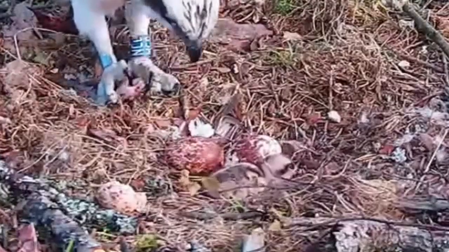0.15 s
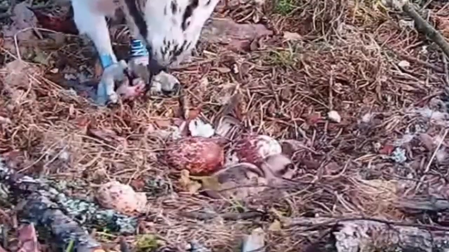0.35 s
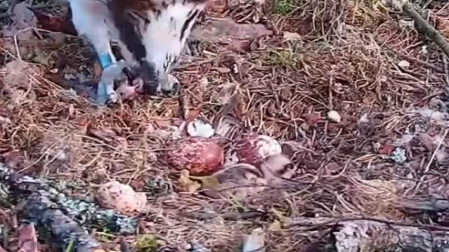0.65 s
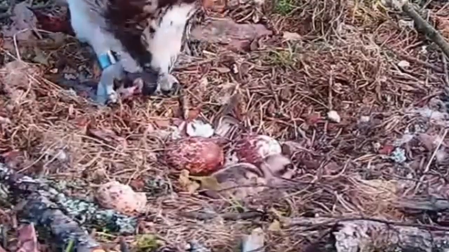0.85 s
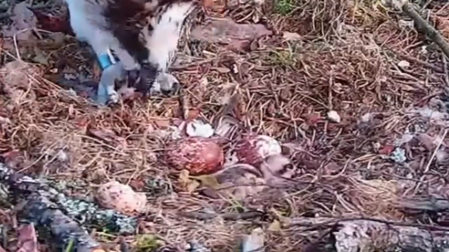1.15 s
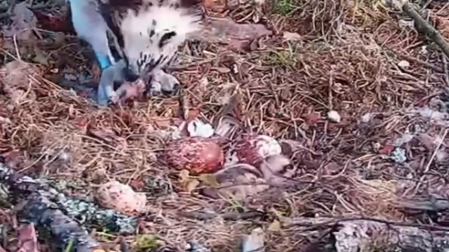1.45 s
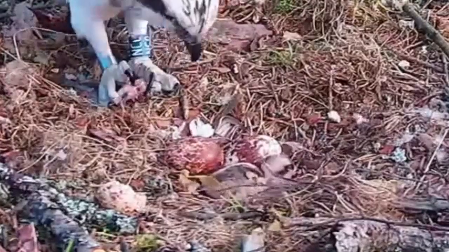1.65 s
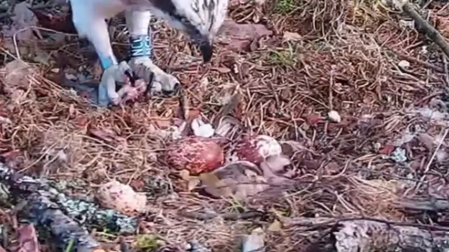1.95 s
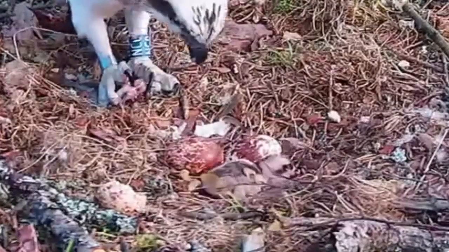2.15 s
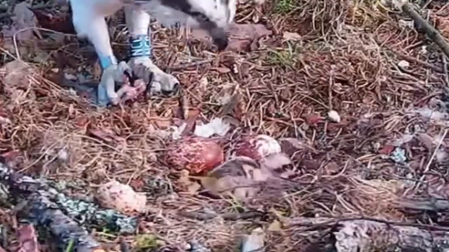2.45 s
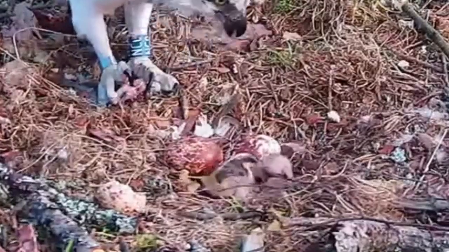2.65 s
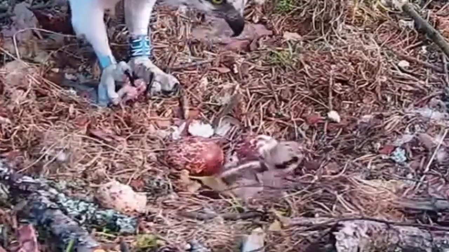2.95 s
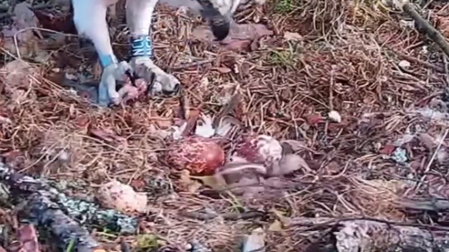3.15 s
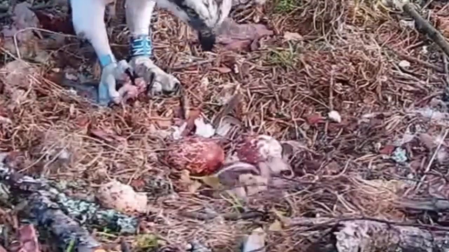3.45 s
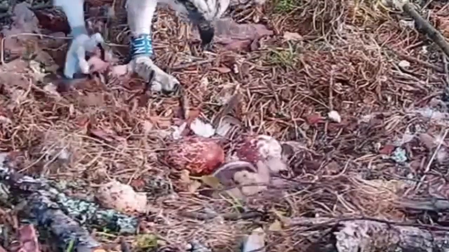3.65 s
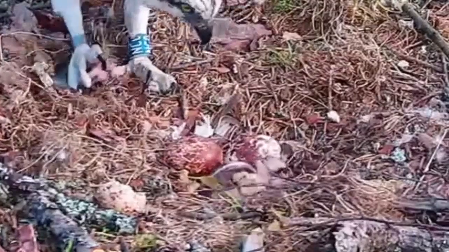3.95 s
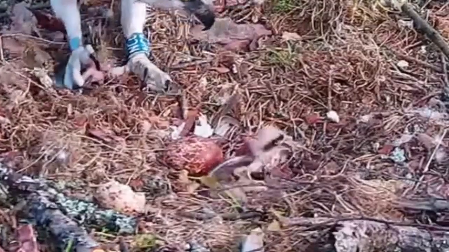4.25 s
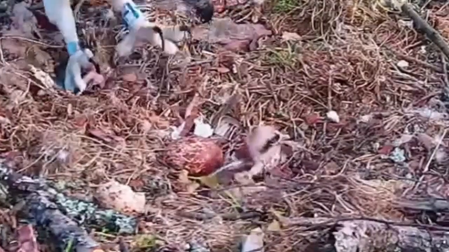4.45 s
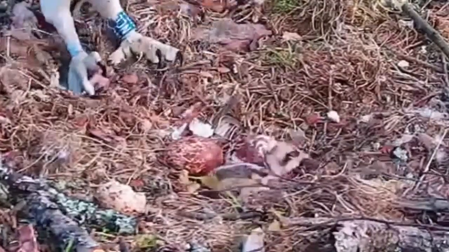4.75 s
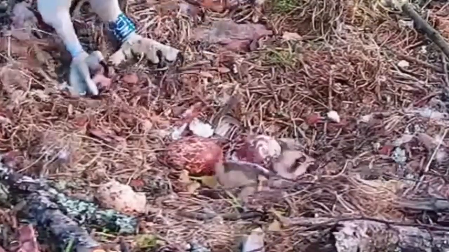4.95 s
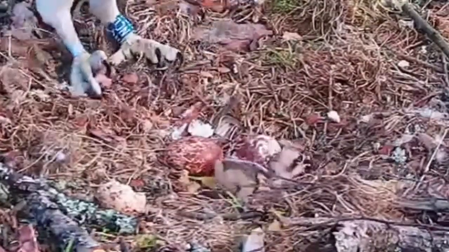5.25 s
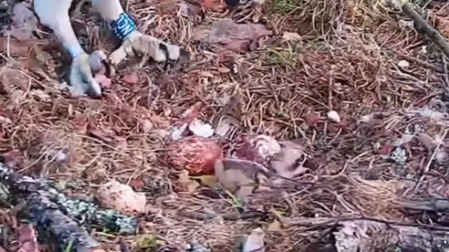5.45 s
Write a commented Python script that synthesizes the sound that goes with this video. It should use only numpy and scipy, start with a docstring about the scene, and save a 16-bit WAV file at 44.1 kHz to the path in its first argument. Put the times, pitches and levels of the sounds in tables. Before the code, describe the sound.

A windy outdoor nest heard through a small camera microphone, with soft leafy hiss, a low far-off roar and a faint, extremely high electronic whine throughout. From 0.2 to 2.75 s a hatchling close by gives eight tiny, hoarse peeps, each arching up and dropping quickly, roughly every third of a second. A twig knocks at 1.4 s and wind swells around 1.7 s. From about 1.8 s distant songbirds add thin whistles, falling swoops and zigzag calls, echoing among trees. Between 3.1 and 4.3 s they become busier, with overlapping clear glides, rising flicks and fast buzzes; a gust peaks near 3.8 s. A rapid buzzy trill runs from 4.3 to 4.8 s while talons drag over crackling twigs, ending with a sharper knock at 4.77 s. A rasp bursts at 4.95 s and fades by 5.3 s. Strong gusts rumble from 5.05 s, with soft low pips near 5.35 and 5.47 s.

```python
"""A treetop nest: gusts rumble on the microphone, distant foliage hisses and a line scan whines throughout.
From the start a newly hatched raptor chick peeps (arched hoarse tones); a twig knocks (ringing sine).
Songbirds further off then whistle, swoop and buzz (pitch curves, some shaken fast), and later trill
while the parent's feet drag over twigs (dense cracks). Last come a long rasp, soft pips and strong gusts."""
import sys
import numpy as np
from scipy import signal
from scipy.fft import rfft, irfft, next_fast_len
from scipy.io import wavfile
from scipy.ndimage import uniform_filter1d

SR = 44100
rng = np.random.default_rng(int(sys.argv[2]) if len(sys.argv) > 2 else 0)


def inscribe(sig):
    """Save sig as 16-bit PCM at rate SR to the path in sys.argv[1].

    A 1-D sig is mono; a 2-D sig holds one channel per row.
    Samples are clipped to [-1, 1] before scaling.
    """
    pcm = np.round(np.clip(np.atleast_2d(sig).T, -1, 1) * 32767)
    wavfile.write(sys.argv[1], SR, pcm.astype(np.int16))


def linear_from_db(decibels):
    """Turn decibels (scalar or array-like) into linear amplitude factors; 0 gives 1."""
    return 10 ** (np.asarray(decibels, float) / 20)


N = 246959
TIME_S = np.arange(N) / SR

# Shape columns: length_share, pitch_share (0 first pitch, 1 second pitch), relative_db.
# chick peeps: start_s, length_s, top_hz, end_hz, level_db, end_swell_db
PEEPS = [(.213, .053, 2670, 1350, -57, 3), (.546, .055, 2580, 1230, -55.5, 0),
         (1.064, .055, 2240, 1180, -57.5, 4), (1.402, .056, 2740, 1200, -56.5, 4),
         (1.744, .054, 2770, 1350, -58, 2), (2.046, .072, 3100, 1400, -57.5, -3),
         (2.389, .059, 3090, 1350, -55.5, 6), (2.702, .046, 2780, 1330, -59.5, 11)]
# peep: arches to its top pitch, then drops to its end pitch
PEEP_SHAPE = [(0, .25, 0), (.07, .05, 1), (.3, 0, 0), (.5, .08, -3), (.7, .38, -4), (.86, .75, -2),
              (1, 1, -1)]
# low half-pitch tones inside the onset of two hoarse peeps (2.399, 2.712 s), then two soft low pips
# (5.336, 5.467 s): start_s, length_s, low_hz, top_hz, level_db
LOW_TONES = [(2.399, .008, 1560, 1650, -63), (2.712, .007, 1480, 1560, -57),
             (5.336, .062, 1620, 2030, -60.5), (5.467, .025, 1710, 1748, -49)]
# low tone: small arch
LOW_TONE_SHAPE = [(0, 0, -3), (.2, .72, 0), (.5, 1, 0), (.8, .68, -3), (1, .2, -8)]
# rising pip from the nest: start_s, length_s, low_hz, top_hz, level_db
RISING_PIPS = [(4.403, .062, 1440, 2060, -64.5)]

# songbird whistles, and one clear strand within the buzz at 3.7 s: time_s, pitch_hz, level_db
CLEAR_CURVES = [
    [(1.935, 3640, -70), (1.955, 4690, -72), (1.972, 5080, -67), (1.995, 4500, -66), (2.025, 4110, -67)],
    [(3.31, 3360, -66), (3.325, 3260, -61), (3.35, 3190, -59), (3.385, 2970, -58), (3.45, 2410, -68)],
    [(3.352, 5430, -66), (3.378, 4600, -62), (3.41, 4370, -62), (3.435, 4270, -58), (3.475, 4200, -59),
     (3.51, 4160, -63), (3.535, 4250, -62)],
    [(3.565, 4350, -62), (3.6, 4200, -62), (3.63, 4120, -59), (3.66, 4130, -64), (3.695, 4270, -58),
     (3.72, 4500, -66)],
    [(3.7, 4880, -65), (3.73, 5200, -63), (3.765, 5050, -65), (3.8, 4950, -66), (3.845, 4900, -67)],
    [(5.14, 3490, -68), (5.16, 4110, -66), (5.18, 3680, -68)],
]
# songbird slurs: start_s, length_s, low_hz, top_hz, level_db
SLURS = [(2.03, .09, 3180, 3370, -73), (2.295, .08, 3000, 3210, -73), (2.49, .07, 3000, 3290, -72),
         (5.452, .058, 4200, 6440, -69), (5.567, .032, 4200, 5950, -64)]
# slur: fast rise that levels off
SLUR_SHAPE = [(0, 0, -2), (.28, .68, 1), (.7, .92, 0), (1, 1, -1)]
# swoops: start_s, length_s, top_hz, ledge_hz, level_db
SWOOPS = [(2.13, .118, 5400, 4020, -68.5), (2.318, .116, 6090, 4000, -70), (2.518, .118, 5640, 3900, -64.5),
          (2.915, .125, 5340, 3830, -68.5)]
# swoop: falls to a ledge, hooks up a little, drops away
SWOOP_SHAPE = [(0, 0, -4), (.07, .35, 0), (.14, .62, -6), (.23, .84, 0), (.52, 1, -1), (.78, .9, 1),
               (.88, 1.06, -1), (1, 1.5, -5)]
# zigzags: start_s, length_s, low_hz, top_hz, level_db
ZIGZAGS = [(2.702, .138, 2500, 4260, -59.5), (3.103, .142, 2430, 4180, -67)]
# zigzag: hops up, dips, climbs long to its top, drops
ZIGZAG_SHAPE = [(0, .3, 0), (.065, .53, 2), (.19, .17, 2), (.3, 0, -2), (.47, .17, -3), (.66, .48, 4),
                (.76, .72, -2), (.86, 1, 1), (1, .3, -7)]
# straight strands: songbird glides, and at 2.808 s the echo of the zigzag whistle off the trees:
# start_s, length_s, from_hz, to_hz, level_db
STRAIGHT_STRANDS = [(.455, .017, 2500, 2520, -68), (1.625, .019, 4820, 6300, -69),
                    (1.73, .021, 4300, 6230, -68), (2.76, .04, 3400, 3450, -69),
                    (2.808, .018, 3400, 3800, -67), (2.975, .04, 3200, 3550, -71.5),
                    (3.015, .03, 4400, 4800, -72.5), (3.533, .025, 3150, 3170, -64),
                    (3.655, .04, 2680, 3050, -66.5), (3.8, .02, 2600, 2120, -64.5),
                    (3.878, .033, 2980, 2760, -67), (3.93, .012, 7130, 8290, -75),
                    (4.006, .01, 3520, 3650, -61), (4.03, .016, 4130, 4050, -60),
                    (4.234, .012, 4250, 4000, -59), (4.338, .018, 2900, 2300, -66),
                    (5.22, .062, 5360, 6680, -76), (5.355, .035, 5750, 6620, -72)]
# straight line
STRAIGHT_SHAPE = [(0, 0, 0), (1, 1, 0)]
# flicks: start_s, length_s, low_hz, top_hz, level_db
FLICKS = [(3.55, .055, 2500, 4090, -67), (3.775, .033, 2800, 4200, -67), (3.983, .032, 2650, 4600, -62),
          (4.183, .037, 2600, 4700, -58.5), (4.895, .056, 3000, 4700, -58)]
# flick: climbs ever faster and louder
FLICK_SHAPE = [(0, 0, -10), (.45, .16, -7), (.78, .5, -1), (1, 1, 2)]
# fast-warbled buzzes: start_s, length_s, from_hz, to_hz, level_db
BUZZES = [(1.835, 0.05, 4680, 4930, -70), (2.393, 0.035, 2480, 3490, -80), (2.703, 0.035, 2640, 2820, -70),
          (3.17, 0.037, 4980, 4800, -73), (3.5, 0.045, 5310, 4580, -63.5), (3.575, 0.043, 4900, 4300, -62),
          (3.7, 0.054, 4500, 4900, -64), (3.755, 0.09, 4800, 4650, -66), (3.805, 0.055, 3800, 3400, -65.5),
          (3.87, 0.077, 3600, 3380, -71), (3.927, 0.033, 5100, 4950, -63.5), (4.012, .045, 4000, 3100, -63),
          (4.075, 0.065, 3500, 3600, -67.5), (4.135, .012, 5100, 5000, -68),
          (4.15, .014, 4930, 4850, -58.5), (4.175, .012, 5000, 5000, -67), (4.222, 0.042, 4280, 3190, -60),
          (4.275, 0.059, 3500, 3600, -70)]
# buzz: starts loud and fades
BUZZ_SHAPE = [(0, 0, 0), (.25, .6, 1), (1, 1, -4)]
# clear down-stroke of a trill beat
STROKE_SHAPE = [(0, 0, 1), (.4, .25, 0), (1, 1, -5)]
# buzzy tail of a trill beat, dipping
TAIL_SHAPE = [(0, 0, -1), (.35, .6, 2.5), (.7, 1, -0.5), (1, 0.805, -9)]
# rasp: bursts out high, sinks, swells, dies away: time_s, pitch_hz, level_db
RASP_CURVE = [(4.95, 3900, -62), (4.975, 3690, -66), (5.02, 3500, -66), (5.05, 3250, -63.5),
              (5.12, 3194, -63), (5.19, 3194, -66), (5.23, 3290, -71), (5.3, 3350, -75)]

# twigs snapping or knocking: start_s, level_db, ring_hz, t60_s
TICKS = [(1.37, -38, 730, 0.014), (1.9, -49, 2500, .008), (4.765, -51, 8100, 0.0097),
         (4.772, -50.5, 6100, 0.017), (4.771, -38, 1100, 0.0071), (4.767, -58, 15000, .004),
         (5.3, -51, 2700, 0.014)]
# talons dragging over twigs: start_s, end_s, level_db
RUSTLES = [(4.4, 4.52, -65), (4.562, 4.66, -74), (4.735, 4.84, -64)]
# spectrum of the twig cracks: frequency_hz, relative_db
TWIG_SPECTRUM = [(500, -10), (2000, 0), (5000, -4), (9500, -7), (11500, -16), (16000, -19)]

# gusts on the microphone: time_s, rumble_db
GUST_CURVE = [(0.0, -48.5), (0.97, -41), (1.2, -48), (1.29, -40), (1.68, -36.5), (1.7, -33), (2.06, -35),
              (2.53, -47), (2.6, -40.5), (3.09, -43), (3.81, -31), (3.91, -38), (5.04, -35), (5.07, -28),
              (5.12, -29), (5.46, -32), (5.49, -31.5), (5.6, -28)]
# short buffets and one brief lull: centre_s, db_relative_to_gust
BUFFETS_AND_LULL = [(1.0, 1.5), (1.339, 6), (1.789, 3.5), (2.93, 2.5), (3.24, 5.5), (4.55, 5), (4.68, -3),
                    (4.78, 5.5), (5.07, 4), (5.51, 5.5)]
# spectrum of the gusts: frequency_hz, relative_db
RUMBLE_SPECTRUM = [(8.8, -41), (15, -1.5), (37, 0), (80, -3), (141, -15), (199, -22), (271, -28),
                   (577, -45), (684, -42), (900, -45), (1170, -53), (1980, -120)]

# distant foliage: time_s, roar_db, hiss_db
FOLIAGE_CURVES = [(0.0, -57, -72.5), (1.36, -59, -71.5), (2.12, -59.5, -75.5), (3.1, -59, -75),
                  (4.26, -57.5, -82), (4.62, -56, -76), (4.94, -58, -84), (5.6, -58.5, -79)]
# spectrum of the low roar: frequency_hz, relative_db
ROAR_SPECTRUM = [(88, -36), (150, -5), (373, -6), (485, -9.5), (799, -11), (860, -11.5), (2140, -21),
                 (3460, -25.5), (5000, -32), (6500, -88), (11000, -120)]
# spectrum of the leafy hiss: frequency_hz, relative_db
HISS_SPECTRUM = [(2500, -41), (4500, 2), (7000, 10.5), (9000, 5.5), (11000, -10), (16000, -30)]

# whine carrier and its sidebands at the field rate: offset_hz, level_db
SCAN_LINES = [(0, -71), (-50, -90), (50, -85), (-100, -85), (100, -95), (-250, -93), (-400, -98)]
# line scan slipping off its pitch: start_s, end_s, shift_hz
SCAN_SLIPS = [(1.19, 1.29, -34), (1.29, 1.38, -17), (1.38, 2.03, 17), (2.87, 2.96, -17), (3.05, 3.14, -17),
              (3.97, 4.07, -34), (5.09, 5.27, -17)]
# spectrum of the preamp hiss: frequency_hz, relative_db
PREAMP_SPECTRUM = [(2000, -5.5), (5000, 2.5), (10000, -4), (14000, -8), (15600, 0), (15800, 3)]


def unit(x):
    """Scale to rms 1."""
    return x / np.sqrt(np.mean(x ** 2))


def colour(x, spectrum):
    """Filter by a spectrum interpolated over log frequency; rms 1."""
    hz, db = np.transpose(spectrum)
    size = next_fast_len(len(x))
    bins_hz = np.arange(size // 2 + 1) * SR / size + 1  # +1 avoids log(0)
    gain_db = np.interp(np.log(bins_hz), np.log(hz), db, left=-60, right=-60)
    return unit(irfft(rfft(x, size) * linear_from_db(gain_db), size)[:len(x)])


def walk(steps_per_s, count=N):
    """Random steps smoothed twice into a wandering curve; spread near 1."""
    hold = max(int(SR / steps_per_s), 2)
    steps = np.repeat(rng.standard_normal(count // hold + 1), hold)
    slewed = uniform_filter1d(uniform_filter1d(steps, hold), hold)
    return unit(slewed)[:count]


def breathing_noise(spectrum, flicker_db, steps_per_s):
    """Coloured noise of rms 1 whose overlapping octave-spaced bands flicker independently."""
    size = next_fast_len(N)
    octave = np.log2(np.arange(size // 2 + 1) * SR / size + 1)
    lowest = np.floor(np.log2(spectrum[0][0]))
    out = np.zeros(N)
    for centre in np.arange(lowest, np.log2(spectrum[-1][0]) + 1):
        share = np.cos(np.pi / 2 * np.clip(octave - centre, -1, 1))
        band = irfft(rfft(rng.standard_normal(size)) * share, size)[:N]
        out += band * linear_from_db(flicker_db * walk(steps_per_s))
    return colour(out, spectrum)


def shaped(rows, shape):
    """Turn note rows into (time_s, pitch_hz, level_db) curves that follow one shape."""
    return [[(start_s + part * length_s, first_hz + way * (second_hz - first_hz), level_db + relative_db)
             for part, way, relative_db in shape]
            for start_s, length_s, first_hz, second_hz, level_db in rows]


def sing(notes, glide_s, edge_s, wobble_hz, flutter_db, steps_per_s, overtone_db=-60,
         shake_hz=0, shakes_per_s=0):
    """A syrinx tone on each pitch curve, with wobble, shake and an overtone the throat lets through."""
    out = np.zeros(N)
    for note in notes:
        s, hz, db = np.transpose(note)
        first, last = int((s[0] - edge_s) * SR), min(int((s[-1] + edge_s) * SR), N)
        t = TIME_S[first:last]
        wobble, flutter, drag = (walk(steps_per_s, count=N // 8)[:last - first] for _ in range(3))
        pitch_hz = uniform_filter1d(np.interp(t, s, hz), int(glide_s * SR) + 1, mode="nearest")
        # a fast muscle shakes the pitch, not quite evenly
        shake_cycles = rng.random() + np.cumsum(shakes_per_s * (1 + 0.24 * drag)) / SR
        shake = np.sin(2 * np.pi * shake_cycles)
        pitch_hz = pitch_hz + wobble_hz * wobble + shake_hz * shake
        phase = 2 * np.pi * np.cumsum(pitch_hz) / SR
        # the throat rings near 3 kHz, so the overtone shows only when the pitch has dropped
        throat = np.exp(-.5 * ((2 * pitch_hz - 3000) / 700) ** 2)
        tone = np.sin(phase) + linear_from_db(overtone_db) * throat * np.sin(2 * phase)
        edge = np.clip(np.minimum(t - t[0], s[-1] + edge_s - t) / (2 * edge_s), 0, 1)
        level = linear_from_db(np.interp(t, s, db) + flutter_db * flutter)
        out[first:last] += np.sqrt(2) * level * np.sin(np.pi / 2 * edge) * tone
    return out


def wood(x, near_t60_s, near_db, far_t60_s, far_db):
    """Near branches throw sparse quick echoes; far trunks give a long diffuse tail."""
    t = TIME_S[:SR]
    for t60_s, db, density in ((near_t60_s, near_db, .02), (far_t60_s, far_db, 1)):
        echoes = rng.standard_normal(SR) * (rng.random(SR) < density)
        tail = echoes * np.exp(-np.log(1000) * t / t60_s) * (t > .004)
        tail = tail / np.sqrt(np.sum(tail ** 2))
        x = x + linear_from_db(db) * signal.fftconvolve(x, tail)[:N]  # the far tail also follows the near echoes
    return x


def chick():
    """Short arched peeps close by, two with a low half-pitch tone in the hoarse onset, and soft pips."""
    calls = sing(peeps(), glide_s=.005, edge_s=.0008, wobble_hz=50, flutter_db=2.2, steps_per_s=350,
                 overtone_db=-6)
    low_notes = shaped(LOW_TONES, LOW_TONE_SHAPE) + shaped(RISING_PIPS, SLUR_SHAPE)
    low_tones = sing(low_notes, glide_s=.006, edge_s=.003, wobble_hz=10, flutter_db=.8, steps_per_s=150)
    return wood(calls + low_tones, near_t60_s=.045, near_db=-11, far_t60_s=.3, far_db=-19)


def peeps():
    """Peep curves on the shared arch; each end changes level by its own swell."""
    swell_from, swell_full = .7, .88  # shares of the length
    ramp = np.clip((np.array(PEEP_SHAPE)[:, 0] - swell_from) / (swell_full - swell_from), 0, 1)
    notes = shaped([row[:-1] for row in PEEPS], PEEP_SHAPE)
    return [np.array(note) + np.outer(row[-1] * ramp, [0, 0, 1]) for note, row in zip(notes, PEEPS)]


def songbirds():
    """Clear tones, hoarser flicks doubled by a reflection, and buzzes whose pitch shakes into a band."""
    strokes, tails = trill()
    tunes = CLEAR_CURVES + strokes + shaped(SLURS, SLUR_SHAPE) + shaped(SWOOPS, SWOOP_SHAPE)
    tunes = tunes + shaped(ZIGZAGS, ZIGZAG_SHAPE) + shaped(STRAIGHT_STRANDS, STRAIGHT_SHAPE)
    clear = sing(tunes, glide_s=.004, edge_s=.002, wobble_hz=26, flutter_db=2.0, steps_per_s=150)
    flicks = sing(shaped(FLICKS, FLICK_SHAPE), glide_s=.004, edge_s=.002, wobble_hz=50,
                  flutter_db=2.2, steps_per_s=260)
    echo_s, echo_db = .008, -4
    flicks = flicks + linear_from_db(echo_db) * np.interp(TIME_S - echo_s, TIME_S, flicks)
    buzz_notes = shaped(BUZZES, BUZZ_SHAPE) + tails + [RASP_CURVE]
    buzz = sing(buzz_notes, glide_s=.008, edge_s=.006, wobble_hz=90, flutter_db=3.5, steps_per_s=320,
                shake_hz=340, shakes_per_s=125)
    clear = wood(clear + flicks, near_t60_s=.07, near_db=-10, far_t60_s=.7, far_db=-11)
    return clear + wood(buzz, near_t60_s=.12, near_db=-6, far_t60_s=1.1, far_db=-4)


def trill(count=6):
    """Down-strokes that grow and buzzy tails that sink beat by beat; the first beat has a tail only."""
    start_s, beat_s = 4.3185, .0775
    stroke_s, stroke_from_hz, stroke_to_hz = .007, 4720, 3650
    first_stroke_db, growth_db_per_beat = -66 + 1.2, 1.2
    tail_s, tail_db = .05, -67.5
    strokes, tails = [], []
    for beat in range(count):
        s = start_s + beat * beat_s
        if beat > 0:
            stroke_db = first_stroke_db + (beat - 1) * growth_db_per_beat
            strokes.append((s, stroke_s, stroke_from_hz, stroke_to_hz, stroke_db))
        tails.append((s + stroke_s, tail_s, 3500 - beat * 40.2, 2436 - beat * 50, tail_db))
    return shaped(strokes, STROKE_SHAPE), shaped(tails, TAIL_SHAPE)


def twigs():
    """Single knocks ring briefly; dragging talons set off dense tiny cracks."""
    out = np.zeros(N)
    for start_s, db, hz, t60_s in TICKS:
        t = np.clip(TIME_S - start_s, 0, 1)
        out += linear_from_db(db) * np.sin(2 * np.pi * hz * t) * np.exp(-np.log(1000) * t / t60_s)
    cracks = (rng.random(N) < .08) * rng.standard_normal(N)
    cracks = cracks * linear_from_db(1.2 * rng.exponential(size=N))  # a few stand out
    crackle = colour(cracks, TWIG_SPECTRUM) * linear_from_db(2.2 * walk(90))
    for start_s, end_s, db in RUSTLES:
        progress = np.clip((TIME_S - start_s) / (end_s - start_s), 0, 1)
        out += linear_from_db(db) * np.sin(np.pi * progress) ** .7 * crackle
    return out


def wind():
    """Turbulent pressure on the capsule, riding the gusts, short buffets and a brief lull."""
    s, gust_db = np.transpose(GUST_CURVE)
    width_s = .018
    bumps_db = sum(change_db * np.exp(-.5 * ((TIME_S - centre_s) / width_s) ** 2)
                   for centre_s, change_db in BUFFETS_AND_LULL)
    level = linear_from_db(np.interp(TIME_S, s, gust_db) + bumps_db)
    return level * breathing_noise(RUMBLE_SPECTRUM, flicker_db=1.5, steps_per_s=9)


def foliage():
    """A smooth roar and a leafy hiss from far trees: two noises with their own level curves."""
    s, roar_db, hiss_db = np.transpose(FOLIAGE_CURVES)
    roar = breathing_noise(ROAR_SPECTRUM, flicker_db=1.0, steps_per_s=14)
    hiss = breathing_noise(HISS_SPECTRUM, flicker_db=2.0, steps_per_s=28)
    return linear_from_db(np.interp(TIME_S, s, roar_db)) * roar + linear_from_db(np.interp(TIME_S, s, hiss_db)) * hiss


def electronics():
    """Preamp hiss, and the line-scan whine that leaks into the cable and slips in pitch."""
    scan_hz, preamp_db = 15625, -69.5
    hz = scan_hz + sum(shift_hz * (TIME_S >= start_s) * (TIME_S < end_s)
                       for start_s, end_s, shift_hz in SCAN_SLIPS)
    phase = 2 * np.pi * np.cumsum(hz) / SR
    whine = np.zeros(N)
    for offset_hz, db in SCAN_LINES:
        line_phase = phase + 2 * np.pi * (offset_hz * TIME_S + rng.random())
        whine += np.sqrt(2) * linear_from_db(db) * np.sin(line_phase)
    return whine + linear_from_db(preamp_db) * colour(rng.standard_normal(N), PREAMP_SPECTRUM)


def scene():
    """Everything reaches one microphone."""
    return (chick() + songbirds() + twigs() + wind() + foliage())[None]


def roll_off(x):
    """The treble ends steeply here."""
    return signal.sosfilt(signal.butter(12, 15930, fs=SR, output="sos"), x)


def record(dry):
    """The camera adds its own noise; a steep low-pass cuts the top."""
    low_pass = signal.ellip(10, .2, 60, 15715, fs=SR, output="sos")  # ripple dB, stop dB, edge Hz
    mix = signal.sosfilt(low_pass, dry + electronics())
    return roll_off(mix)


dry = scene()
out = record(dry)
inscribe(out)
```